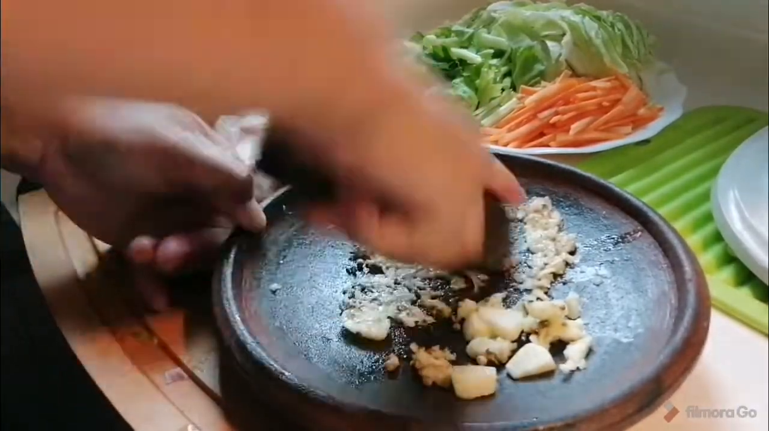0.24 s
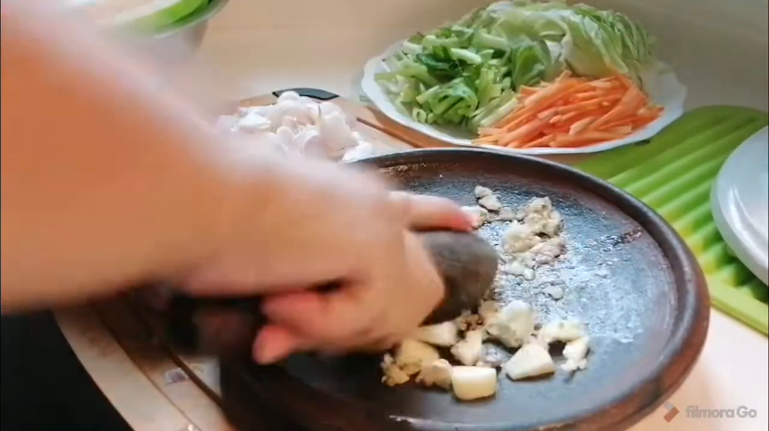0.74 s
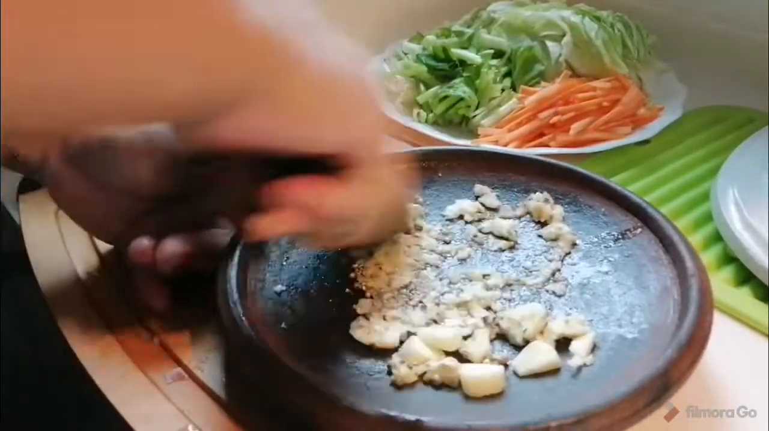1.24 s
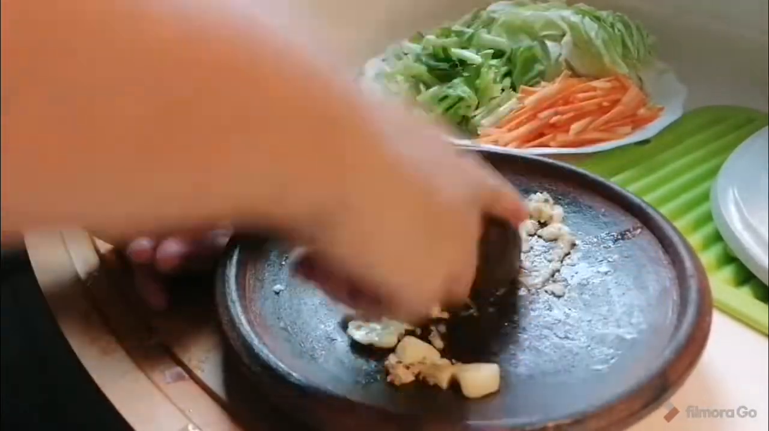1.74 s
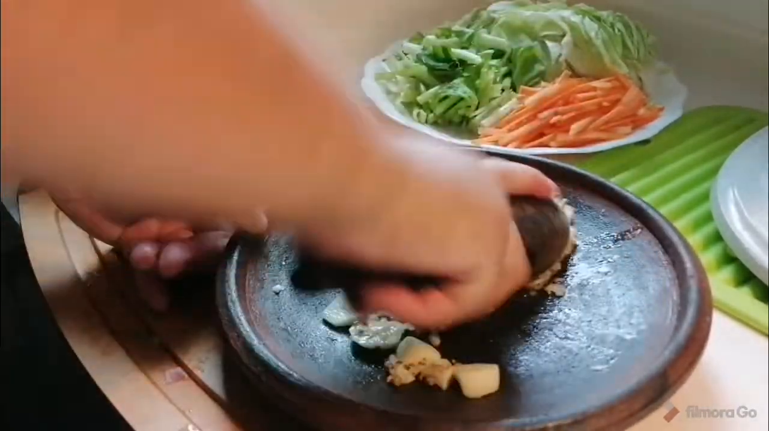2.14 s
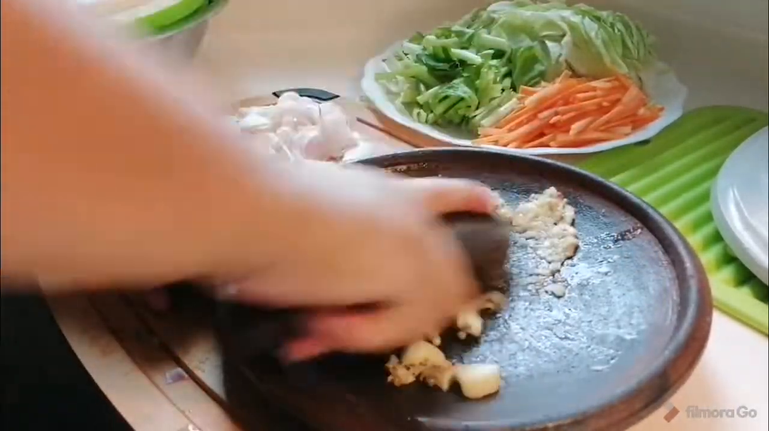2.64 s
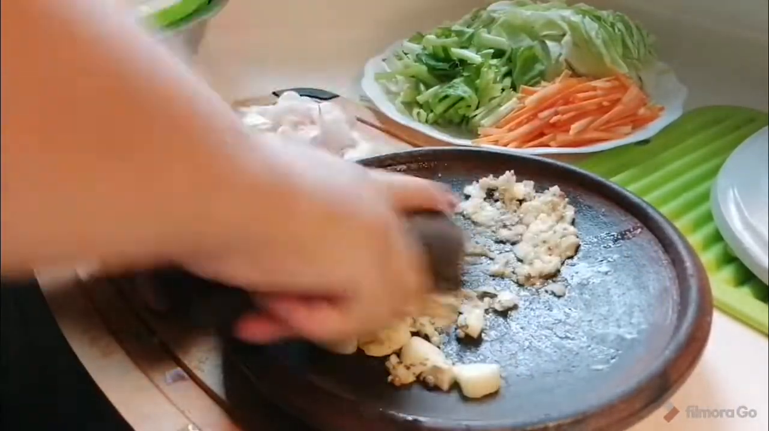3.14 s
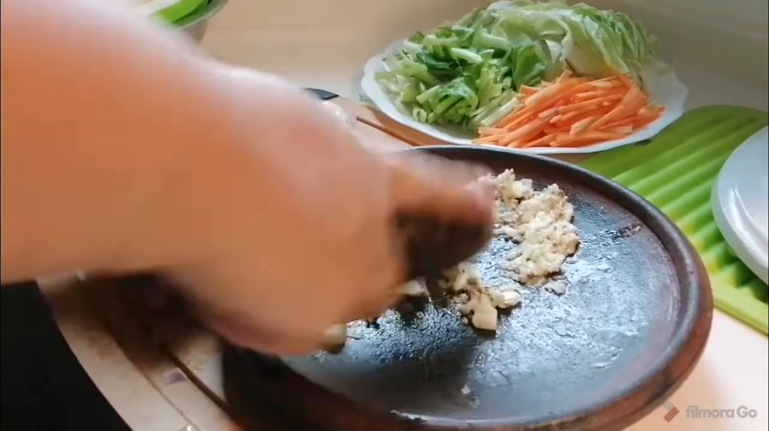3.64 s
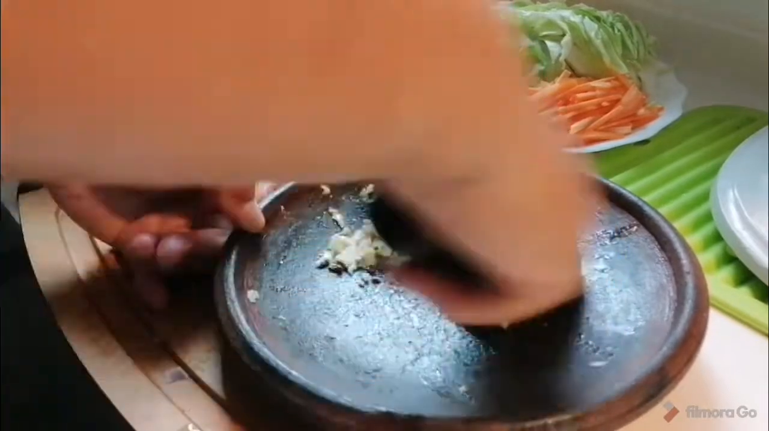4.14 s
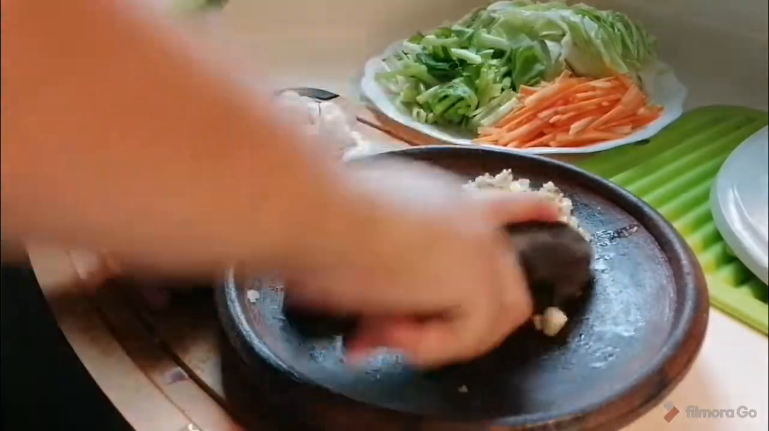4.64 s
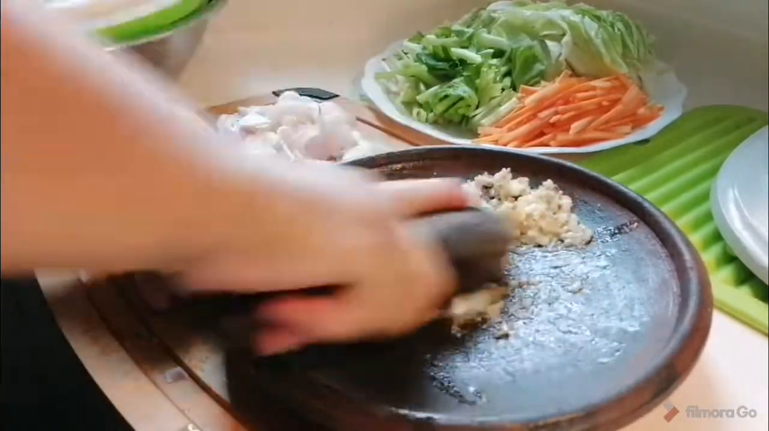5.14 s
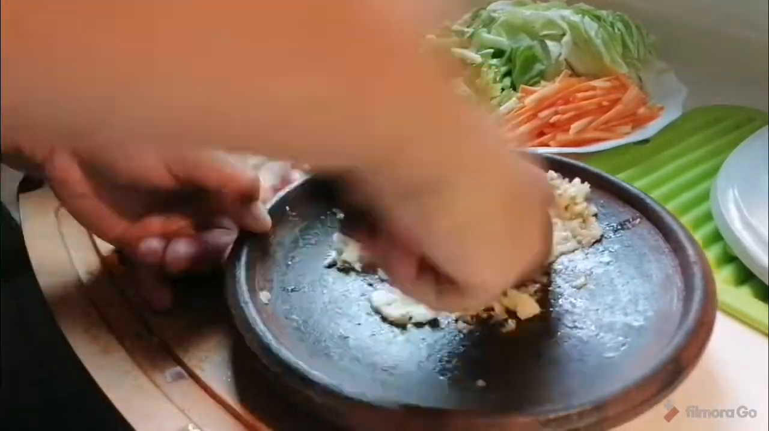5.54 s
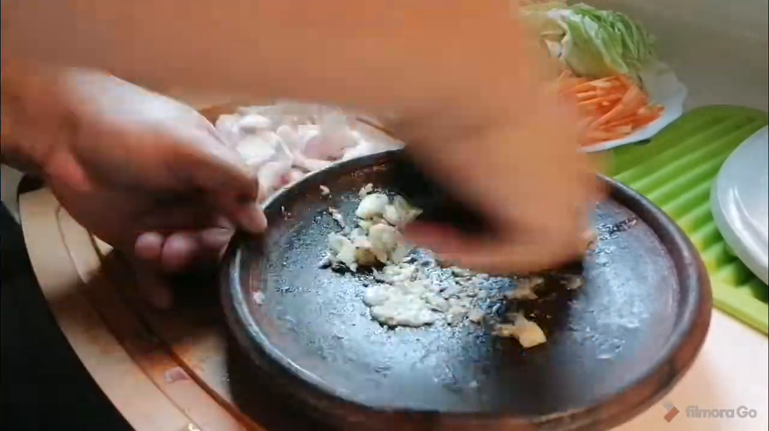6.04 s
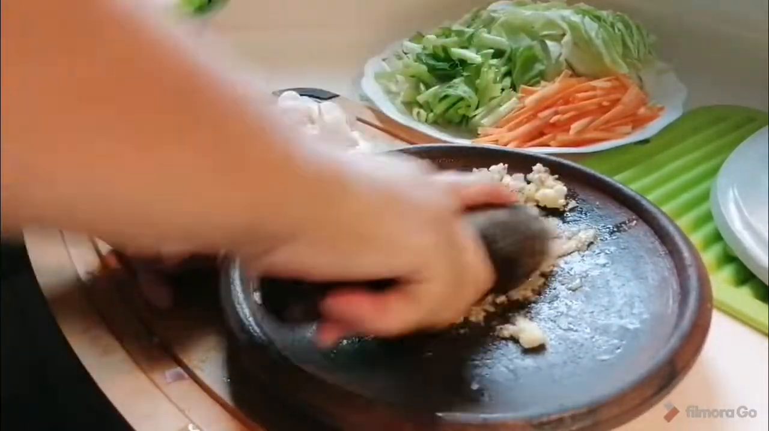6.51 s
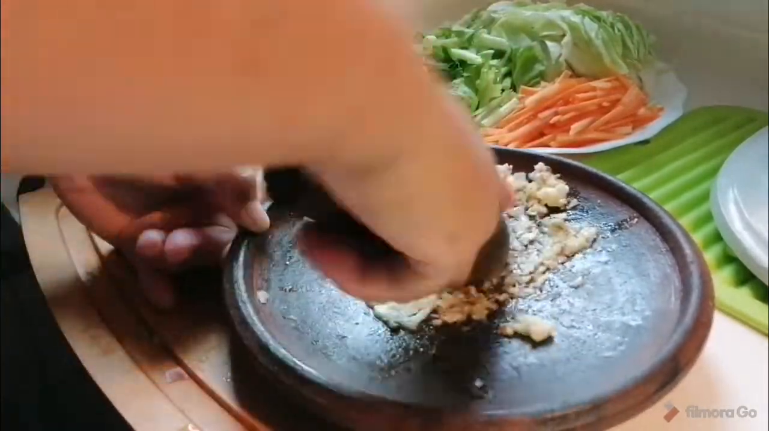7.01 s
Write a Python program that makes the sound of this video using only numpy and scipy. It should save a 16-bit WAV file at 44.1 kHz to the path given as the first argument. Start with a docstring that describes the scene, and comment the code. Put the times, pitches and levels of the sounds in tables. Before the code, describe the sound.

A pestle grinds garlic in a wide clay mortar with quick gritty rasping strokes, small cracks and hollow knocks on a wooden table, close up.

```python
"""Pestle grinding garlic and spices in a wide clay mortar: strokes of fracture grains rasp, hiss and rumble.
Seeds crack (noise bursts) and the pestle knocks as it is set down; resonances ring the clay dish.
The wooden table top hums with the strokes and booms after knocks (resonators); the small kitchen
answers with noise echoes over a low house hush. Two close microphone ports colour the channels.
"""
import sys
import numpy as np
from scipy import signal
from scipy.fft import rfft, irfft
from scipy.io import wavfile
from scipy.ndimage import uniform_filter1d, map_coordinates

SR = 44100
rng = np.random.default_rng(int(sys.argv[2]) if len(sys.argv) > 2 else 0)


def file_out(sig):
    """Save sig as 16-bit WAV at sys.argv[1]."""
    # one column per channel
    cols = np.atleast_2d(sig).T
    # limit, then scale
    lim = np.clip(cols, -1, 1)
    pcm = np.round(lim * 32767).astype(np.int16)
    wavfile.write(sys.argv[1], SR, pcm)


N = 320599
TIME = np.arange(N) / SR


def from_db(db):
    """Decibels to amplitude gain."""
    return 10 ** (np.asarray(db) / 20)


def in_db(power):
    """Power to decibels."""
    return 10 * np.log10(power + 1e-12)


def rms_one(x):
    """Scale to unit power."""
    return x / np.sqrt(np.mean(x ** 2) + 1e-20)


def at_hz(points, hz):
    """Interpolate a table on a log-frequency axis."""
    known_hz, values = np.transpose(points)
    return np.interp(np.log(hz + 1e-3), np.log(known_hz), values)


def drift(rate_hz):
    """Random line through rate_hz new points a second, spread about 1."""
    points = rng.standard_normal(8192)
    return np.interp(TIME * rate_hz, np.arange(8192), points) * np.sqrt(3 / 2)


def band(x, low_hz, high_hz, order=2):
    """Causal Butterworth band-pass."""
    edges_hz = [low_hz, min(high_hz, .45 * SR)]
    return signal.sosfilt(signal.butter(order, edges_hz, "band", fs=SR, output="sos"), x + 1e-18)


def coloured(x, colour, size=2048):
    """Minimum-phase filter with the given spectrum, built by folding the cepstrum."""
    log_gain = np.log(from_db(at_hz(colour, np.fft.rfftfreq(size, 1 / SR))))
    cepstrum = irfft(log_gain)
    cepstrum[1:size // 2] *= 2
    cepstrum[size // 2 + 1:] = 0
    return signal.oaconvolve(x, irfft(np.exp(rfft(cepstrum))))[:N]


def resonate(x, modes):
    """Parallel two-pole resonances, each with its own peak height."""
    out = 0
    for hz, width_hz, db in modes:
        r = np.exp(-np.pi * width_hz / SR)
        poles = [1, -2 * r * np.cos(2 * np.pi * hz / SR), r * r]
        out = out + from_db(db) * (1 - r * r) / 2 * signal.lfilter([1, 0, -1], poles, x + 1e-18)
    return out


def peaked(x, peaks):
    """Chain of peaking filters that lift some bands and dull others."""
    for hz, width_hz, db in peaks:
        gain = from_db(db / 2)
        damp = np.tan(np.pi * width_hz / SR)
        turn = -2 * np.cos(2 * np.pi * hz / SR)
        zeros = [1 + damp * gain, turn, 1 - damp * gain]
        poles = [1 + damp / gain, turn, 1 - damp / gain]
        x = signal.lfilter(zeros, poles, x)
    return x


def panned(x, balance_db):
    """Mono to stereo at constant power; positive is left."""
    left, right = from_db(balance_db / 2), from_db(-balance_db / 2)
    return np.array([x * left, x * right]) / np.sqrt((left ** 2 + right ** 2) / 2)


def add(out, start_s, sound):
    """Mix a sound in at start_s."""
    at = round(start_s * SR)
    out[..., at:at + sound.shape[-1]] += sound[..., :N - at]


# house background spectrum: f/Hz, relative level/dB
HUSH_COLOUR = [(15, -80), (25, 4), (108, 5), (195, -26.5), (270, -7), (516, -16), (1040, -17), (1290, -42),
               (2690, -24), (3920, -53), (6740, -27.5), (7710, -60), (14800, -46), (16000, -61)]


def hush(level_db, apart_db):
    """Low steady house background: coloured noise, mostly shared by both channels."""
    shared = rms_one(coloured(rng.standard_normal(N), HUSH_COLOUR, size=8192))
    apart = rms_one(coloured(rng.standard_normal(N), HUSH_COLOUR, size=8192))
    apart = from_db(apart_db) * apart + band(apart, 900, 18000, order=1)
    return from_db(level_db) * (shared + apart * [[1], [-1]])


# left-right likeness of echoes: f/Hz, correlation [-1..1]
ECHO_LIKENESS = [(100, 0.96), (300, 0.7), (700, 0.08), (1500, 0.39), (15000, 0.02)]


def diffuse_bands(size):
    """Stereo noise in nine bands of about an octave, alike in the bass and nearly unrelated in the treble."""
    edges_hz = np.geomspace(40, 19000, 10)
    for low_hz, high_hz in zip(edges_hz, edges_hz[1:]):
        hz = np.sqrt(low_hz * high_hz)
        alike = np.clip(at_hz(ECHO_LIKENESS, hz), -1, 1)
        mid, side = band(rng.standard_normal((2, size)), low_hz, high_hz, order=3)
        mid, side = np.sqrt(1 + alike) * mid, np.sqrt(1 - alike) * side
        yield hz, (mid + side * [[1], [-1]]) / np.sqrt(2)


# kitchen reverberation: f/Hz, time to fall 60 dB/s
KITCHEN_T60 = [(100, 0.146), (300, 0.1), (800, 0.33), (2500, 0.29), (7000, 0.47), (14000, 0.33)]


def echoes(early_db, early_s, early_hz, late_db, size=22000):
    """Quick reflections off dish and arm, too small to return long waves; then the hard-walled room's tail."""
    t, echo = TIME[:size], 0
    for hz, noise in diffuse_bands(size):
        early = np.exp(-t / early_s) * (t > .0006)
        early *= from_db(early_db) * hz / np.hypot(hz, early_hz) / np.linalg.norm(early)
        late = from_db(-60 * t / at_hz(KITCHEN_T60, hz)) * (t > .005)
        late *= from_db(late_db) / np.linalg.norm(late)
        echo = echo + noise * np.hypot(early, late)
    return echo


def kitchen(x, lag_ms, sway_ms, count=5):
    """The pestle circles through places with their own echoes; the left port hears it slightly later."""
    place = TIME * 11 + 0.42 * drift(3)  # 11 places/s
    sway = np.sin(2 * np.pi * place / count)
    lag_samples = (lag_ms + sway_ms * sway) * SR / 1000
    out = np.array([map_coordinates(x[0], [np.arange(N) - lag_samples], order=3), x[1]])
    for k in range(count):
        away = np.minimum(np.abs((place - k + count / 2) % count - count / 2), 1)
        here = x * np.cos(np.pi / 2 * away)
        echo = echoes(early_db=0.5, early_s=0.0043, early_hz=437, late_db=-4.5)
        out += signal.oaconvolve(here, echo, axes=1)[:, :N]
    return out


# table top modes: f/Hz, width/Hz, relative level/dB
TABLE_MODES = [(78.2, 2.9, -6), (91.4, 5.95, 8.5), (125.5, 2.9, 0.5), (155.8, 3.1, -4.5)]


def table_top(jolts, push_db):
    """The wooden top hums under the judder of the strokes and booms after each knock."""
    judder = resonate(rng.standard_normal(N), TABLE_MODES)
    judder /= np.sqrt(uniform_filter1d(judder ** 2, size=3000) + 1e-12)  # the arm keeps the shaking even
    return from_db(push_db) * judder + resonate(jolts, TABLE_MODES)


def contact(decay_ms, crumble, size=4096):
    """A first sharp touch, then a noisy crumbling that decays exponentially."""
    decay_samples = max(decay_ms, .3) * SR / 1000
    force = crumble * rng.standard_normal(size) * np.exp(-np.arange(size) / decay_samples)
    force[0] += 1
    return force


def bounced(force, ms, share):
    """The pestle rebounds and lands once more, softly, a moment later."""
    gap = int(max(ms, 1) * rng.uniform(1.826, 2.8) * SR / 1000)
    return force + share * np.concatenate([np.zeros(gap), force])[:len(force)]


def part(force, low_hz, high_hz, db):
    """One register of a contact, its energy set as a level over 10 ms."""
    x = band(force, low_hz, high_hz)
    return from_db(db) * x / np.sqrt(np.sum(x ** 2) / (SR / 100))


# dish rocking on its foot: f/Hz, width/Hz, relative level/dB
FOOT_MODES = [(163, 25, 2.5), (199, 50, -8), (259, 39, -1), (324, 35, -9)]
# pestle landings, levels before trims: t/s, thud/dB, clack/dB, ring/dB, tick/dB, table boom/dB,
# decay/ms, left-right/dB
KNOCKS = [(0.559, -33, -31, -41, -44, -30.5, 6.9, 0), (0.788, -40, -38, -55, -46, -41, 12, 6),
          (0.872, -41, -48, -40.5, -46, -51, 5.7, -3), (1.415, -44.5, -48, -80, -57, -49, 3.7, -1),
          (1.479, -27, -30.5, -35.5, -41, -26, 3.6, -3.5), (1.75, -41, -51.5, -75, -48, -40.5, 2.2, -3),
          (1.803, -38, -47, -64, -44, -38.5, 4.9, -7), (2.405, -55, -39.5, -44, -48, -46, 7, -8),
          (2.53, -52, -40, -62, -53, -54, 3.8, 1), (2.677, -44.5, -46.5, -49, -55, -41.5, 2.5, -6),
          (2.776, -46, -41, -58, -57, -36.5, 6.3, -4), (3.021, -39.5, -30.5, -57, -61, -46, 7, 0),
          (3.66, -39, -42, -59, -68, -41.5, 6.6, -3), (3.753, -43, -58, -71, -51, -49, 2.6, -1),
          (4.0, -37.5, -53, -69, -51.5, -41, 8, -3), (4.028, -40.5, -60, -73, -60, -43.5, 6, -5),
          (4.406, -35, -40.5, -57, -54, -49, 5.4, -9), (4.657, -59, -65, -48, -44.5, -58, 3.8, -5),
          (5.285, -34, -32, -45, -59, -43, 2.7, -3), (5.76, -42.5, -54, -46.5, -50, -37, 9.2, 1.5),
          (5.886, -32, -35.5, -51.5, -57, -26.5, 6.2, -1), (6.608, -25.5, -31.5, -37.5, -45, -36, 4.7, -7),
          (6.864, -33, -34.5, -51, -68, -40.5, 9.6, -6.5), (6.947, -22.5, -22, -25, -28, -26, 2.4, 2.5)]


def knocking():
    """The pestle lands: the dish thuds on its foot and clacks; returns the sound and jolts to the table."""
    out, jolts = np.zeros((2, N)), np.zeros(N)
    for start_s, thud_db, clack_db, ring_db, tick_db, boom_db, ms, balance_db in KNOCKS:
        force = contact(ms, crumble=0.094)
        thud = part(resonate(force, FOOT_MODES), low_hz=107, high_hz=398, db=thud_db + 0.5)
        clack = part(bounced(force, ms, share=0.44), low_hz=457, high_hz=916, db=clack_db - 6.5)
        ring = part(bounced(force, ms, share=0.27), low_hz=1260, high_hz=2740, db=ring_db - 2.0)
        tick = part(force, low_hz=3350, high_hz=7360, db=tick_db - 7.5)
        add(out, start_s, panned(thud, balance_db - 2.0) + panned(ring - clack - tick, balance_db))
        add(jolts, start_s, part(force, low_hz=52.3, high_hz=238, db=boom_db + 6))
    return out, jolts


# seeds cracking, levels before trims: t/s, snap/dB, splinters/dB, left-right/dB, decay/ms
CRACKS = [(0.159, -39, -51, 10, 3.5), (0.32, -34, -39, 25, 0.97), (0.5418, -34.5, -28, 3.5, 1),
          (0.603, -36.5, -42, 3, 1.7), (0.95, -31.5, -25.5, -0.5, 2.1), (1.222, -42.5, -47, 2.5, 11),
          (1.411, -73, -36, -18, 7.2), (1.852, -40.5, -59, -7, 8.1), (2.161, -60, -42, 3, 2.5),
          (2.408, -40, -38, -3, 3.5), (2.667, -42, -61, -11, 2.6), (2.7, -34.5, -35, -12, 1.2),
          (2.812, -40.5, -42.5, -3, 4.2), (3.021, -49, -34.5, -18, 0.87), (3.345, -34, -50, -12, 2),
          (4.031, -65, -42.5, -2.5, 1.8), (4.139, -37, -45, -13, 7.5), (4.5234, -35.5, -34, 0.5, 4),
          (4.686, -44, -37, -7, 1.7), (4.788, -45, -40, -10, 1.9), (4.9782, -31, -33, -3, 4.3),
          (5.214, -34, -61, 20, 2.8), (5.277, -52, -33, -3, 5), (5.3037, -33.5, -33.5, 0, 1.7),
          (5.3544, -28, -26.5, 0.5, 0.66), (5.4811, -35, -37, -4, 4.9), (5.58, -36, -45, 0, 11),
          (6.3752, -38.5, -35, -0.5, 2.1), (6.635, -33.5, -38, -8, 1.5), (6.851, -62, -40, -8, 2.3)]


def cracking():
    """A seed gives way with a snap, a spray of splinters and a sharp tip."""
    out = np.zeros((2, N))
    for start_s, snap_db, splinter_db, balance_db, ms in CRACKS:
        force = contact(ms, crumble=0.35)
        snap = part(force, low_hz=1330, high_hz=3360, db=snap_db - 3.5)
        splinters = part(force, low_hz=4280, high_hz=8430, db=splinter_db - 5.0)
        tip = part(contact(ms, crumble=0.03), low_hz=8600, high_hz=15000, db=splinter_db - 19.5)
        # alternating signs join neighbouring registers without a hollow
        add(out, start_s, panned(snap - splinters + tip, balance_db))
    return out


SETTLE_S = 0.0013  # pestle settling on the grit


def swell(start_s, rise_s, fall_s, db, touch_db):
    """Power of one push or roll: sets in quickly, climbs from touch_db below its crest, dies away."""
    t = TIME - start_s
    climbing_db = touch_db * (1 - t / max(rise_s, .002))
    dying_db = -20 * (t - rise_s) / max(fall_s, .01)
    live = (t >= 0) & (dying_db > -80)
    level_db = db + np.minimum(climbing_db, dying_db)[live]
    power = np.zeros(N)
    power[live] = from_db(level_db) ** 2 * (1 - np.exp(-t[live] / SETTLE_S))
    return power


# The pestle meets grit first and bites the clay as weight comes on: first touch relative to crest.
RASP_TOUCH_DB, GRIT_TOUCH_DB, HUM_TOUCH_DB = -16.5, -9.5, -5.5
GRIT_LINGERS, HUM_LINGERS = 1.053, 1.92  # fall time / rasp fall time
TOUCH_BRIGHT_DB = 13  # the pestle's edge touches first; gone at the crest
IDLE_RASP_DB, IDLE_GRIT_DB = -75, -78  # faint rubbing and loose grit between pushes
# pushes over the clay, levels before trims: t/s, rise/s, 20 dB fall/s (at least 0.01), rasp/dB,
# rasp brightness/dB, grit/dB, table hum/dB, left-right/dB
STROKES = [(0.0, 0.0017, 0.16, -41, 6.5, -43.5, -44, 1), (0.155, 0.025, 0.31, -44, 3, -47, -57, 0),
           (0.268, 0.022, 0.0544, -34.5, 3, -41, -40.5, 0.5), (0.439, 0.015, 0.15, -47, 18, -42, -62, 2.5),
           (0.54, 0.052, -0.04, -41, -1, -44, -41, -4), (0.786, 0.043, 0.25, -41.5, 7, -52, -46, -3),
           (0.85, 0.038, 0.0046, -34, 1, -36, -39, -7), (0.96, 0.015, 0.34, -49, -5, -46, -47, -5),
           (1.05, 0.041, 0.11, -39, -5, -45, -44, -4.5), (1.19, 0.041, 0.02, -36, 3.5, -41, -44.5, -1.5),
           (1.395, 0.13, 0.07, -40, -3.5, -43.5, -48.5, -4.5), (1.752, 0.12, 0.07, -39, -5, -46, -47, -7.5),
           (2.038, 0.052, 0.56, -64, 10, -50.5, -58, -2.5), (2.142, 0.051, 0.09, -41, 13, -43, -58, -7.5),
           (2.311, 0.093, 0.125, -42.5, -7, -43, -50, -4.5), (2.478, 0.04, .12, -44.5, 5.5, -41, -66, -5.5),
           (2.653, 0.023, 0.05, -34.5, -7, -42, -58, -1), (2.759, 0.067, 0.08, -41, -4, -46, -40, -4),
           (3.032, 0.089, 0.08, -39.5, 5.5, -42.5, -47, -4.5),
           (3.21, .055, 0.06, -49.5, -6, -43.5, -68, -4.5),
           (3.318, 0.038, 0.0757, -39.5, 1, -43.5, -43.5, -5),
           (3.448, 0.018, 0.05, -44, -0.5, -54.5, -46, -8.5),
           (3.657, 0.069, 0.05, -40.5, -1.5, -47, -58, -7.5), (4.029, 0.11, .06, -41, -3, -43.5, -48.5, -6),
           (4.333, 0.062, 0.23, -50.5, 4, -42, -44.5, -7.5), (4.44, 0.037, 0.28, -48, -2, -42.5, -42, -10),
           (4.6, 0.077, 0.02, -38, -11, -49, -71, 0), (4.738, 0.018, 0.12, -43.5, 1, -43, -45, -3.5),
           (4.875, .02, 0.2, -37.5, -1, -49.5, -52, -7), (4.94, 0.032, 0.18, -38.5, -8, -53, -39.5, 1),
           (5.029, 0.017, 0.13, -43.5, 12, -44.5, -55, 0), (5.14, 0.042, 0.09, -33.5, -10, -40, -54, -0.5),
           (5.25, 0.028, 0.18, -45.5, 3, -40.5, -48, -5), (5.36, 0.015, 0.28, -41.5, 16, -51, -54, -1),
           (5.44, 0.019, 0.13, -37, -3.5, -45, -61, -2), (5.569, 0.016, 0.1342, -39.5, 1, -44.5, -46, -4),
           (5.759, 0.082, 0.13, -42, -3.5, -50, -46, -3.5), (5.88, 0.058, 0.07, -42.5, 1, -46, -48, -4.5),
           (6.172, 0.066, 0.24, -47.5, 21, -43.5, -47, -0.5), (6.329, 0.026, 0.11, -40.5, -3, -46, -48, 0),
           (6.498, 0.012, 0.33, -51, 21, -48, -59, -1.5),
           (6.588, 0.048, 0.0937, -37, -0.5, -39, -41.5, -7.5),
           (6.764, 0.02, .05, -45, -1, -42.5, -49.5, -6.5), (6.909, 0.03, 0.14, -49.5, 5, -46.5, -56, -7),
           (7.049, 0.046, 0.05, -46, -8, -69, -58, 2)]


def pushing():
    """Sum stroke powers; return rasp level, brightness, grit level, grit side and hum level, all in dB."""
    rasp, grit = from_db(IDLE_RASP_DB) ** 2, from_db(IDLE_GRIT_DB) ** 2
    bright = side = hum = 0
    for start_s, rise_s, fall_s, rasp_db, bright_db, grit_db, hum_db, balance_db in STROKES:
        rasped = swell(start_s, rise_s, fall_s, rasp_db, RASP_TOUCH_DB)
        crushed = swell(start_s, rise_s, fall_s * GRIT_LINGERS, grit_db, GRIT_TOUCH_DB)
        on_edge = np.clip(1 - (TIME - start_s) / max(rise_s, .002), 0, 1)
        rasp = rasp + rasped
        bright = bright + rasped * (bright_db + TOUCH_BRIGHT_DB * on_edge)
        grit = grit + crushed
        side = side + crushed * balance_db
        hum = hum + swell(start_s, rise_s, fall_s * HUM_LINGERS, hum_db, HUM_TOUCH_DB)
    return in_db(rasp), bright / rasp, in_db(grit), side / grit, in_db(hum)


PUSH_RUMBLE_DB, IDLE_RUMBLE_DB = -16, -59.5  # relative to each push's rasp; constant floor
# pestle rolling over soft pulp, level before trim: t/s, rise/s, 20 dB fall/s (at least 0.01), level/dB
ROLLS = [(0.29, 0.018, 0.23, -57), (0.54, 0.019, 0.1, -34), (0.79, 0.023, 0, -45), (1.06, 0.023, 0.16, -42),
         (1.48, 0.027, .17, -40.5), (1.79, .03, 0.21, -40.5), (2.37, 0.018, -0.35, -42),
         (3.025, 0.026, 0.3, -39.5), (3.66, 0.038, 0.23, -37), (4.0, 0.078, 0.24, -38),
         (4.409, 0.016, -1.3, -33), (4.658, 0.017, -0.23, -39.5), (4.92, 0.036, 0.8, -54),
         (5.29, 0.1, -0.1, -51), (5.86, 0.0088, 0.26, -43), (6.21, 0.019, .12, -41.5),
         (6.6, .02, 0.3, -43.5), (6.85, 0.019, 0.23, -40.5), (6.98, .04, 0.16, -43)]


def rolling(rasp_db):
    """Level in dB of the dull rumble of all rolls and pushes."""
    rolls = sum(swell(*roll, touch_db=-7) for roll in ROLLS)
    pushes = from_db(rasp_db + PUSH_RUMBLE_DB) ** 2
    return in_db(rolls + pushes + from_db(IDLE_RUMBLE_DB) ** 2)


def grains(per_s, spread_db, clump_db, clump_hz):
    """Tiny fractures of uneven size, bunched as the pestle sticks and slips."""
    born = rng.random(N) < per_s / SR
    sizes = from_db(spread_db * np.minimum(rng.exponential(1, N), 4)) * rng.choice([-1, 1], N)
    return born * sizes * from_db(clump_db * np.clip(drift(clump_hz), -2, 2))


def shifting(x, depth_db, rate_hz):
    """The contact patch moves, so neighbouring registers swell and fade on their own."""
    edges_hz = np.geomspace(900, 9000, 8)
    out = x.copy()
    for low_hz, high_hz in zip(edges_hz, edges_hz[1:]):
        gain = from_db(depth_db * np.clip(drift(rate_hz), -1.5, 1.5))
        out += band(x, low_hz, high_hz, order=1) * (gain - 1)
    return rms_one(out)


def tilted(x, bright_db, pivot_hz):
    """A stroke with the rim of the pestle sounds brighter than one with its flat."""
    dull = signal.sosfiltfilt(signal.butter(3, pivot_hz, fs=SR, output="sos"), x)
    gain = from_db(bright_db)
    return (dull + gain * (x - dull)) / np.sqrt((1 + gain ** 2) / 2)


# grinding spectra: f/Hz, relative level/dB
RASP_COLOUR = [(150, -10.5), (300, -12), (480, -19), (850, -13), (1200, -1.5), (2000, 2.5), (3000, -2),
               (4000, -7.5), (6000, -4.5), (12000, -30)]
GRIT_COLOUR = [(1500, -21), (3000, -4.5), (4500, -0.5), (7000, 1), (9000, 4.5), (11000, -8), (15000, -17.5)]
ROLL_COLOUR = [(70, -21.5), (155, 4), (290, -0.5), (450, -4.5), (750, -18.5), (1100, -15.5), (2500, -43.5)]


def grinding(rasp_db, bright_db, grit_db, balance_db):
    """Coarse grains rasp on the clay, fine grit hisses over them, and the pestle rumbles as it rolls."""
    roll_db = rolling(rasp_db)
    coarse = grains(per_s=1100, spread_db=3.0, clump_db=1.5, clump_hz=190)
    fine = grains(per_s=3500, spread_db=4.5, clump_db=0.8, clump_hz=110)
    lumps = grains(per_s=540, spread_db=1.0, clump_db=7.0, clump_hz=66)
    # bursting salt crystals tick in both rasp and grit
    crystals = from_db(15) * grains(per_s=30, spread_db=2.5, clump_db=-5.0, clump_hz=0.92)
    rasp = shifting(coloured(coarse + 0.6 * crystals, RASP_COLOUR), depth_db=2.0, rate_hz=14)
    rasp = from_db(rasp_db - 3.5) * tilted(rasp, bright_db, pivot_hz=2030)
    grit = coloured(fine + .5 * coarse + crystals, GRIT_COLOUR)
    grit = from_db(grit_db - 1.5) * shifting(grit, depth_db=1.5, rate_hz=7.9)
    roll = from_db(roll_db - 6.0) * rms_one(coloured(lumps, ROLL_COLOUR))
    # the moving hand shades one port or the other, the treble most
    return panned(rasp, 0.74 * balance_db + 3.0) + roll + panned(grit, balance_db - 1.5)


# clay dish resonances: f/Hz, width/Hz, lift/dB
DISH_PEAKS = [(402, 204, -1.5), (658, 28, 4.5), (784, 64, 6.5), (900, 140, 1.5), (1150, 190, 6),
              (1444, 68, 11), (1543, 31, 7.5), (1800, 200, 3), (2730, 295, 6.5), (3170, 150, 2.5),
              (3330, 250, 4.5), (4310, 150, 3.5)]


def scene():
    """Every contact rings the dish; the room answers and the table booms underneath."""
    rasp_db, bright_db, grit_db, side_db, hum_db = pushing()
    knocks, jolts = knocking()
    contacts = grinding(rasp_db, bright_db, grit_db, side_db) + cracking() + knocks
    dish = peaked(contacts, DISH_PEAKS)
    boom = panned(table_top(jolts, hum_db), balance_db=-4.0)
    return kitchen(dish, lag_ms=0.286, sway_ms=.12) + boom + hush(level_db=-54.0, apart_db=-19)


# microphone port resonances: f/Hz, width/Hz, lift/dB
LEFT_PORT = [(177, 110, -1), (557, 157, -5.5), (5970, 6100, -3.5), (7700, 2100, 0)]
RIGHT_PORT = [(970, 540, 0), (2130, 130, -2.5), (7085, 990, 17.5), (9090, 6440, -13.5)]


def record(dry):
    """The cavity before each microphone colours its channel; the deepest bass and the top are cut."""
    heard = np.array([peaked(dry[0], LEFT_PORT), peaked(dry[1], RIGHT_PORT)])
    heard = signal.sosfilt(signal.butter(3, 34, "high", fs=SR, output="sos"), heard)
    cutoff_hz = 15500
    return signal.sosfilt(signal.ellip(10, .3, 70, cutoff_hz, fs=SR, output="sos"), heard)


dry = scene()
out = record(dry)
file_out(out)
```